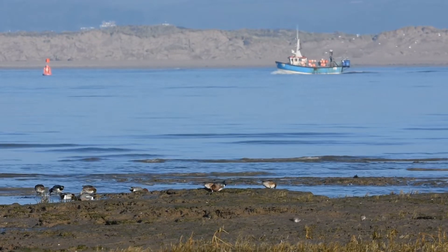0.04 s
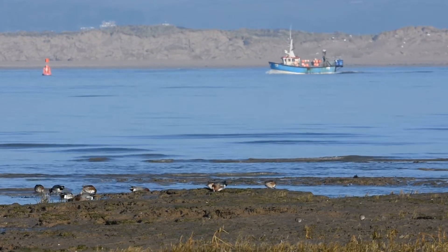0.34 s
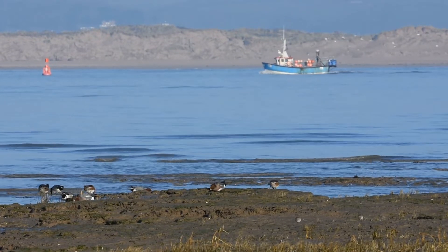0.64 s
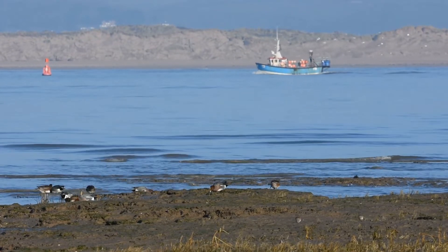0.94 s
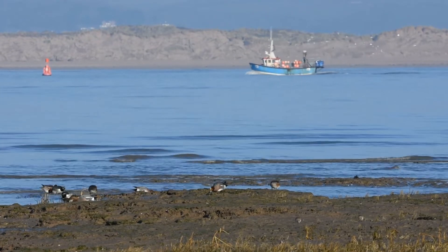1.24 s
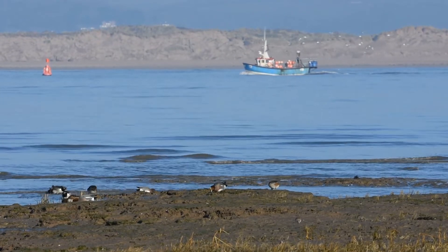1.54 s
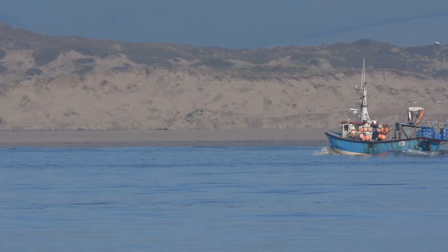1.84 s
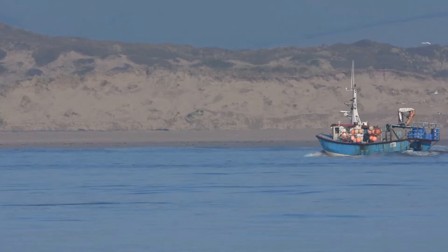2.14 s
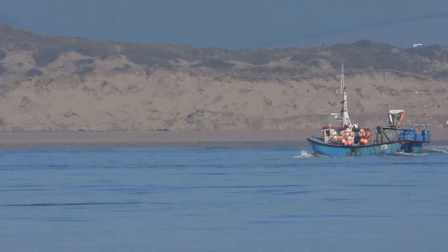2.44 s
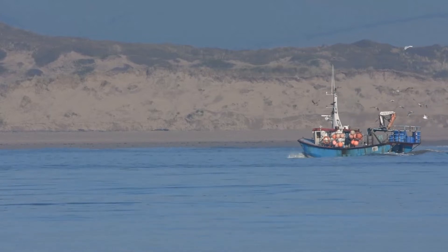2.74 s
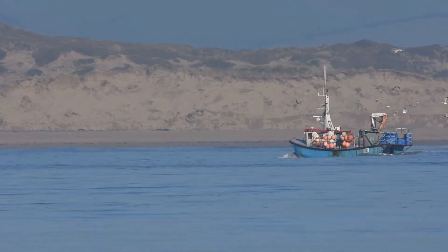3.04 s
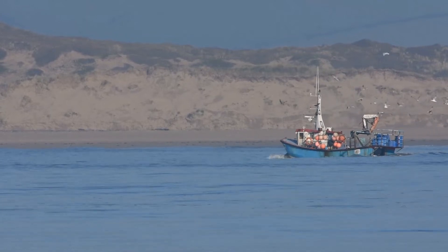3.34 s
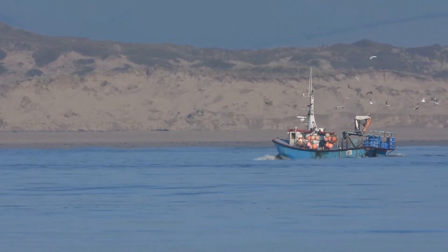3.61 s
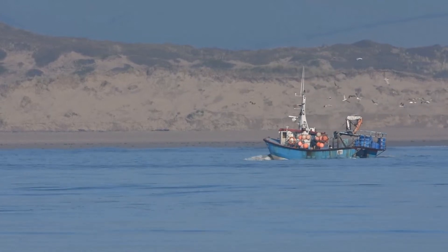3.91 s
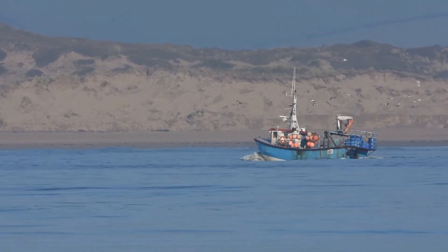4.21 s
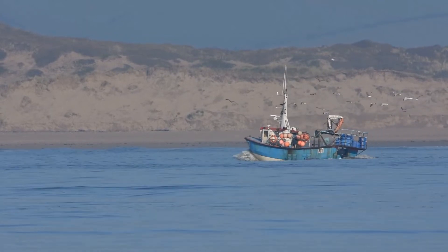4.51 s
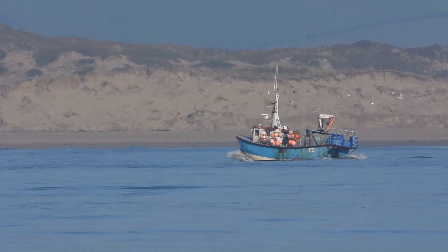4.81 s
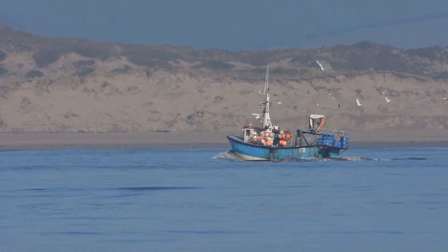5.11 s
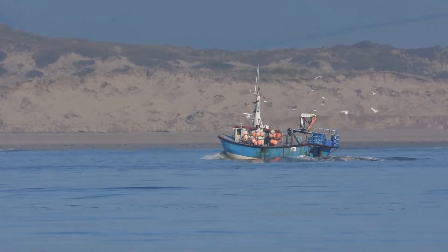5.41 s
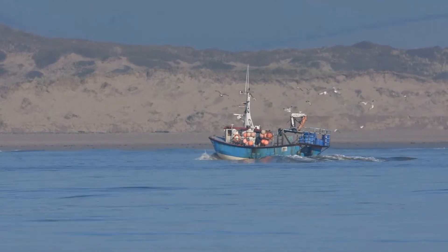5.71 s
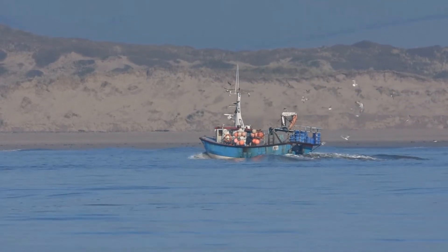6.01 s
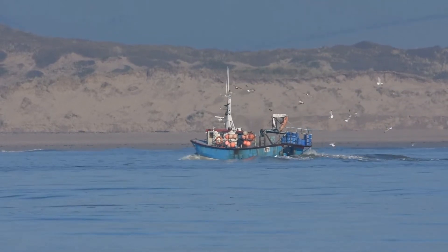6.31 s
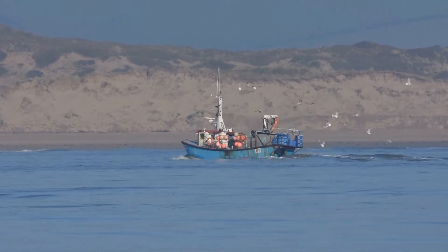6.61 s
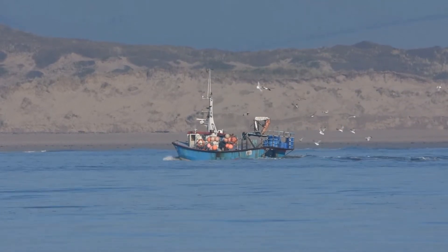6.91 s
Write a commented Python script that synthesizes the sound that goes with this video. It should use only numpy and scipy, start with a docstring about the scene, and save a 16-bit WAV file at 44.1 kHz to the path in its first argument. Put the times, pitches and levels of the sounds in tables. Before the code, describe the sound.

A flock of gulls squabbles by the shore, their harsh cries overlapping above a quiet, even wash of water and a distant fishing boat's hum. High yelps and sinking wails lead into a busier second half, with one bird calling note after note among squawks, peeps and whistles, and far birds yapping behind. The cries have a dull, light outdoor echo and a slightly clipped edge at the microphone.

```python
"""Gulls squabble over an estuary; each cry is a jittering membrane tone.
Three arched call notes open, with high yelps and young birds' whistles, over water and a boat's engine.
From 1 to 4 s come four mews, with a bark at 3.1 s. From 3.3 s a long call runs on, note after note,
amid falling cries, peeps and squawks. The far flock is loudest at 4.5 s; one tick follows at 5.8 s.
Throughout, the shore echoes and loud cries have a gritty, clipped edge, like an overloaded microphone."""
import sys
import numpy as np
from scipy import signal
from scipy.fft import rfft, irfft
from scipy.io import wavfile
from scipy.ndimage import uniform_filter1d

SR = 44100
rng = np.random.default_rng(int(sys.argv[2]) if len(sys.argv) > 2 else 0)


def output_pcm(signal):
    """Save a mono or channel-first signal as 16-bit PCM at the path in sys.argv[1].

    Samples are clipped to [-1, 1] before scaling.
    """
    pcm = np.clip(np.atleast_2d(signal).T, -1, 1) * 32767
    wavfile.write(sys.argv[1], SR, np.round(pcm).astype(np.int16))


N = 315315

# One bird's long calls. Each row, one note: start, drop and end in seconds, held level in dB,
# fall level in dB, octave over fundamental during the fall in dB.
CALL_NOTES = [(0.104, 0.183, .249, -29, -24, 4.5), (.431, 0.514, .588, -29.5, -28, 6),
              (0.774, 0.851, .955, -34, -31, 5), (3.269, 3.377, 3.422, -32.5, -22.5, -2.5),
              (3.542, 3.641, 3.698, -31, -24, -1.5), (3.839, 3.958, 4.003, -29.5, -23, -2),
              (4.134, 4.239, 4.294, -32, -24, 2.5), (4.422, 4.53, 4.582, -28, -24.5, 3),
              (4.715, 4.823, 4.868, -31, -21.5, .5), (5.006, 5.097, 5.15, -29, -26, 7.5),
              (5.29, 5.409, 5.507, -28.5, -21.5, -11.5), (5.602, 5.707, 5.761, -36.5, -28, -1.5),
              (5.883, 5.991, 6.065, -34.5, -33, -0.5), (6.187, 6.293, 6.335, -37, -29, 1.5),
              (6.474, 6.57, 6.617, -34, -28, 1), (6.765, 6.875, 6.974, -36.5, -30, -11)]
# That bird's excitement. Each row: time in seconds, excitement from 0 to 1.
CALL_EXCITEMENT = [(.1, 0), (.9, 0), (3.3, 0.4), (4.1, 1), (4.8, 0.7), (5.9, 0.75), (6.9, 0.4)]
# Drawn-out wails. Each row: start, crest, fade onset and end in seconds, crest pitch in Hz,
# pitch it sinks towards in Hz, level in dB, octave over fundamental in dB.
MEW_NOTES = [(1.076, 1.13, 1.145, 1.38, 1302, 1096, -20.5, -14),
             (2.171, 2.16, 2.275, 2.53, 1530, 1253, -22.5, -3),
             (2.546, 2.61, 2.592, 2.78, 1297, 1090, -24, -14.5),
             (3.652, 3.65, 3.75, 4.03, 1500, 1272, -31, 0)]
# Short falling cries. Each row: start and end in seconds, base pitch in Hz, level in dB,
# octave over fundamental in dB.
FALL_NOTES = [(1.372, 1.465, 1338, -31, -18), (3.721, 3.817, 1303, -31, -9), (4.108, 4.263, 1330, -29, -8),
              (4.692, 4.808, 1496, -28.5, -6.5), (4.889, 4.995, 1333, -33.5, -2.5),
              (5.057, 5.146, 1426, -21.5, -10.5), (5.282, 5.357, 1314, -28.5, -5),
              (5.549, 5.726, 1350, -31.5, -7), (5.749, 5.844, 1408, -32, .5),
              (5.798, 5.901, 1201, -29.5, 0), (6.029, 6.112, 1273, -32.5, -11),
              (6.117, 6.197, 1431, -29, 0.5), (6.18, 6.273, 1465, -34.5, -6), (6.436, 6.533, 1404, -29, -3),
              (6.523, 6.577, 1494, -27, -6.5), (6.798, 6.884, 1426, -30.5, 0.5)]
# Their common glide. Each row: share of the length, ratio to base pitch.
FALL_GLIDE = [(0, 0.99), (0.299, .95), (.75, .895), (1, .8)]
# One high-voiced bird. Each row: start in seconds, pitch drop in seconds, octave level in dB.
YELP_NOTES = [(.234, .227, -40.5), (.725, .79, -43.5), (1.031, 1.11, -39), (1.423, 1.425, -37),
              (1.685, 1.752, -37.5), (1.934, 1.929, -43.5), (2.068, 2.069, -36.5), (2.397, 2.391, -37.5),
              (2.513, 2.575, -41.5), (2.727, 2.719, -36.5), (2.889, 2.896, -43), (2.992, 3.047, -37),
              (3.163, 3.222, -45.5), (3.334, 3.367, -37.5), (3.533, 3.542, -43), (3.869, 3.866, -43.5),
              (4.188, 4.188, -45), (4.475, 4.515, -37), (5.968, 5.971, -47.5)]
# Young birds. Each row: start and end in seconds, first and last pitch in Hz, level in dB.
WHISTLE_NOTES = [(0, 0.132, 1748, 1712, -35.5), (0.099, 0.2, 1715, 1722, -32.5),
                 (2.87, 3.015, 2170, 2070, -28), (3.013, 3.152, 2110, 2203, -28.5),
                 (4.276, 4.364, 2033, 1966, -35.5), (4.335, 4.465, 2180, 2050, -34.5),
                 (4.46, 4.607, 2095, 2184, -35), (4.656, 4.712, 2180, 2145, -32),
                 (5.449, 5.529, 1947, 1890, -24), (5.575, 5.86, 2315, 2347, -38.5),
                 (5.855, 5.906, 2244, 2029, -22.5), (6.397, 6.473, 2420, 2306, -30),
                 (6.46, 6.757, 2150, 2240, -35), (6.916, 6.997, 1984, 1888, -30.5)]
# Brief rising notes. Each row: start in seconds, first pitch in Hz, level in dB,
# octave over fundamental in dB.
PEEP_NOTES = [(1.998, 1395, -42, -4.5), (2.659, 1414, -42, -1), (2.785, 1491, -26, -12.5),
              (4.04, 1298, -35.5, -1), (5.965, 1397, -39, 3), (6.35, 1420, -35.5, 4.5),
              (6.731, 1458, -27.5, -10), (7.022, 1380, -38.5, -3), (7.11, 1495, -34.5, -3)]
# Short hoarse squawks, some at the end of other cries. Each row: start in seconds, level in dB.
SQUAWKS = [(0.588, -33), (2.522, -28), (4.362, -32.5), (4.968, -24), (5.258, -26.5), (5.68, -27),
           (6.437, -26)]
# Distant birds. Each row: time in seconds, level in dB.
FAR_FLOCK_DB = [(0, -48.5), (1.7, -46), (3.2, -41), (4.5, -35), (6, -37), (7.15, -38)]
# Water and distant engine noise. Each row: frequency in Hz, relative spectral density in dB.
WASH_SPECTRUM = [(25, -17), (70, -4), (170, 4.5), (350, -1), (850, -5.5), (4100, -11.5), (4700, -25.5),
                 (16000, -46)]
# The engine's higher tone. Each row: time in seconds, level in dB.
ENGINE_DRONE_DB = [(0, -75), (2.6, -66.5), (2.95, -53), (3.4, -61.5), (4.5, -56.5), (5.6, -61.5),
                   (7.15, -71)]
# Wind puffs. Each row: centre in seconds, peak level in dB.
WIND_PUFFS = [(2.52, -49), (3.97, -46)]

SQUAWK_HZ, SQUAWK_HARSH_REL_DB = 1119, -37.5
TIME_S = np.arange(N) / SR


def from_db(db):
    return 10 ** (np.asarray(db) / 20)


def unit_rms(x):
    return x / np.sqrt(np.mean(x ** 2) + 1e-20)


def butter(x, hz, kind, order=2):
    return signal.sosfilt(signal.butter(order, hz, kind, fs=SR, output="sos"), x)


def lookup(x, table):
    return np.interp(x, *np.transpose(table))


def drift(count, rate_hz):
    """Gaussian random points joined by straight lines."""
    knots = rng.standard_normal(int(count * rate_hz / SR) + 2)
    return np.interp(np.arange(count) * rate_hz / SR, np.arange(len(knots)), knots)


def arch_db(t, depth_db):
    """Swell to the middle, then ebb."""
    return depth_db * (np.sin(np.pi * np.linspace(0, 1, len(t))) - .75)


def add(out, t, sound):
    """Mix in at t[0] seconds."""
    at = max(int(t[0] * SR), 0)
    out[at:at + len(sound)] += sound[:max(len(out) - at, 0)]


def syrinx(t, hz, first_db, second_db, jitter, doubling_rel_db, upper_rel_db, harsh_db=-99,
           step_db=-11, attack_s=.0045, release_s=.007, flutter_db=2.0):
    """One cry: a jittering membrane tone with thin overtones and a gritty, clipped treble edge."""
    count = len(t)
    phase = 2 * np.pi * np.cumsum(hz * (1 + jitter * drift(count, 900))) / SR
    tone = from_db(first_db) * np.sin(phase)
    tone += from_db(second_db) * np.sin(2 * phase + rng.uniform(0, 2 * np.pi))
    third_db = np.minimum(second_db, (first_db + second_db) / 2) + upper_rel_db
    for k in range(3, 6):
        throat_db = np.interp(k * hz, [4150, 4700], [0, -8])
        tone += from_db(third_db + throat_db + (k - 3) * step_db) * np.sin(k * phase)
    # Alternate cycles differ: lines between the harmonics.
    tone += from_db(first_db + doubling_rel_db) * (np.sin(1.5 * phase) + .5 * np.sin(2.5 * phase))
    # Flattened wave tops, like an overloaded microphone: gritty treble overtones.
    wave = tone / (from_db(first_db) + from_db(second_db)) + .05 * drift(count, 3000)
    grit = butter(np.clip(wave, -.45, .45), 4320, "high", order=6)
    tone += from_db(harsh_db) * unit_rms(grit)
    envelope = np.clip(np.minimum((t - t[0]) / attack_s, (t[-1] - t) / release_s), 0, 1)
    air_flutter = from_db(flutter_db * drift(count, 130))
    return tone * envelope * air_flutter


def long_calls(calm_hz=1517, excited_hz=1599, rasp_hz=1200):
    """Each note opens with a rising rasp, is held, catches, then falls steeply and louder."""
    out = np.zeros(N)
    for start, drop, end, held_db, fall_db, octave_rel_db in CALL_NOTES:
        t = np.arange(start, end + .0016, 1 / SR)
        fall_s = end - drop
        excitement = lookup(start, CALL_EXCITEMENT)
        top_hz = calm_hz + excitement * (excited_hz - calm_hz)
        catch_db = np.interp(excitement, [.15, .5], [2, -17])
        dulling_db = np.interp(excitement, [.15, .5], [0, -3])
        drop_ratio = np.interp(excitement, [.15, .5], [.99, .97])
        end_ratio = np.interp(excitement, [.15, .5], [.735, .755])
        turns_s = [start, (start + drop) / 2, drop - .012, drop,
                   drop + .27 * fall_s, drop + .77 * fall_s, end]
        hz = top_hz * np.interp(t, turns_s, [.968, .995, 1, drop_ratio, .9, .83, end_ratio])
        push = np.interp(t, [drop - .003, drop + .0094], [0, 1])
        swell_db = np.interp(t, [start, drop - .04, drop - .014, drop + .0051, drop + fall_s / 2, end],
                             [1.5, 1.5, catch_db, -1, 0, -4])
        first_db = held_db + push * (fall_db - held_db) + swell_db
        accent_db = 7 * np.exp(-(t - start) / .018)
        second_db = first_db + accent_db + (1 - push) * (dulling_db - 3) + push * octave_rel_db
        # The voice cracks at the end.
        jitter = np.interp(t, [drop, end - .018, end], [.003, .004 + .008 * excitement, .045])
        harsh_db = -45 + .92 * (fall_db + max(octave_rel_db, octave_rel_db / 2) + 23) + dulling_db
        grit_db = np.interp(t, [drop - .005, drop + .23 * fall_s, end - .3 * fall_s, end],
                            [-37, 3, 4.5, -15.5])
        add(out, t, syrinx(t, hz, first_db, second_db, jitter, doubling_rel_db=-36,
                           upper_rel_db=-16 + 7 * push * excitement, harsh_db=harsh_db + grit_db,
                           attack_s=.005, flutter_db=1.7))
        squawk(out, start - .033, rasp_hz, held_db - 3 * excitement, harsh_db - 13,
               octave_rel_db=-5, upper_rel_db=-12.5, glide=.26, length_s=.0242, jitter=.086)
    return out


def mews(rise_hz_per_s2=22100, sink_s=.12, swell_db_per_s=102, fade_db_per_s=63, dull_db_per_s=35):
    """Wails crest, sink and fade, octave first; period doubling and harshness peak with the level."""
    out = np.zeros(N)
    for start, crest, fade, end, top_hz, low_hz, db, octave_rel_db in MEW_NOTES:
        t = np.arange(start, end, 1 / SR)
        before_s, after_s, fading_s = np.maximum([crest - t, t - crest, t - fade], 0)
        sink = np.exp(-(after_s / sink_s) ** 1.5)
        hz = low_hz + (top_hz - low_hz) * sink - rise_hz_per_s2 * before_s ** 2
        first_db = db - swell_db_per_s * before_s - fade_db_per_s * fading_s
        second_db = first_db + octave_rel_db - dull_db_per_s * fading_s
        doubling_rel_db = np.interp(first_db, [-32, -22], [-20, -15])
        harsh_db = first_db - 28 + 2 * (first_db - db)
        add(out, t, syrinx(t, hz, first_db, second_db, jitter=.0082, doubling_rel_db=doubling_rel_db,
                           upper_rel_db=-17, harsh_db=harsh_db, step_db=-4.5, flutter_db=1.46))
    return out


def falling_cries():
    """Each cry sinks, then cracks; the stronger its octave, the harsher it is."""
    out = np.zeros(N)
    for start, end, base_hz, db, octave_rel_db in FALL_NOTES:
        t = np.arange(start, end, 1 / SR)
        hz = base_hz * lookup(np.linspace(0, 1, len(t)), FALL_GLIDE)
        jitter = np.interp(t, [end - .02, end], [.012, .07])
        second_db = db + octave_rel_db
        add(out, t, syrinx(t, hz, db, second_db, jitter, doubling_rel_db=-37, upper_rel_db=-14,
                           harsh_db=second_db - 27, step_db=-3, attack_s=.0039, flutter_db=4))
    return out


def yelps(full_yelp_db=-34.5, break_after_s=.057):
    """A thin note, led at first by its octave, slides down until the voice breaks into a squawk."""
    out = np.zeros(N)
    for start, drop, db in YELP_NOTES:
        t = np.arange(start, drop + .0605, 1 / SR)
        hz = np.interp(t - drop, [0, .022, .06], [2120, 1985, 1890])
        second_db = db + np.interp(t - drop, [-.07, 0], [-7, 1])
        first_db = second_db + np.interp(t - drop, [0, .035], [-6, 2])
        add(out, t, syrinx(t, hz, first_db, second_db, jitter=.002, doubling_rel_db=-48,
                           upper_rel_db=-16.5, attack_s=.0079))
        break_db = full_yelp_db + 10.5 + 1.35 * (db - full_yelp_db)
        squawk(out, drop + break_after_s, SQUAWK_HZ, break_db, break_db + SQUAWK_HARSH_REL_DB)
    return out


def squawk(out, start_s, hz, db, harsh_db, octave_rel_db=-14, upper_rel_db=3, glide=-.11,
           length_s=.0335, jitter=.054):
    """The voice breaks into a short, low, chaotic rasp, mixed into out."""
    t = np.arange(start_s, start_s + length_s, 1 / SR)
    pitch_hz = hz * (1 + glide * np.linspace(-.5, .5, len(t)))
    add(out, t, syrinx(t, pitch_hz, db, db + octave_rel_db, jitter, doubling_rel_db=-26,
                       upper_rel_db=upper_rel_db, harsh_db=harsh_db))


def whistles():
    """Young birds' thin, nearly pure glides; only the lowest keep a clear octave."""
    out = np.zeros(N)
    for start, end, first_hz, last_hz, db in WHISTLE_NOTES:
        t = np.arange(start, end, 1 / SR)
        hz = last_hz + (first_hz - last_hz) * np.linspace(1, 0, len(t)) ** 2
        first_db = db + arch_db(t, depth_db=6)
        second_db = first_db + np.interp(first_hz, [1750, 1900], [-7, -28])
        add(out, t, syrinx(t, hz, first_db, second_db, jitter=.0022, doubling_rel_db=-34.5,
                           upper_rel_db=-11, flutter_db=1.9))
    return out


def peeps(length_s=.081, rise_hz_per_s=742):
    """Short notes that creep upwards."""
    out = np.zeros(N)
    for start, first_hz, db, octave_rel_db in PEEP_NOTES:
        t = np.arange(start, start + length_s, 1 / SR)
        hz = first_hz + rise_hz_per_s * (t - start)
        first_db = db + arch_db(t, depth_db=7)
        add(out, t, syrinx(t, hz, first_db, first_db + octave_rel_db, jitter=.01, doubling_rel_db=-36,
                           upper_rel_db=-19, attack_s=.0078))
    return out


def bark_and_tick(bark_s=3.133, tick_s=5.756):
    """A hoarse bark at the end of a whistle; later, one crisp tick."""
    out = np.zeros(N)
    squawk(out, bark_s, hz=1324, db=-22, harsh_db=-55, octave_rel_db=-4.5, upper_rel_db=-11,
           length_s=.021)
    t = np.arange(0, .01, 1 / SR)
    add(out, tick_s + t, from_db(-27) * drift(len(t), 14000) * np.exp(-t / .002))
    return out


def far_flock(yaps=150):
    """Distant birds yap at random, short and hoarse, dulled by the air."""
    out = np.zeros(N)
    for when, length, pitch, strength in rng.random((yaps, 4)):
        t = when * N / SR + np.arange(0, .026 + .0635 * length, 1 / SR)
        hz = (1120 + 400 * pitch ** 2) * (1 - .0832 * np.linspace(0, 1, len(t)))
        add(out, t, syrinx(t, hz, 8 * strength, 8 * strength - 7, jitter=.035, doubling_rel_db=-17,
                           upper_rel_db=3.5, attack_s=.0086))
    return unit_rms(butter(out, 2820, "low", order=4)) * from_db(lookup(TIME_S, FAR_FLOCK_DB))


def shore_echo(x, t60_s=.7, delay_s=.012, gain_db=-17):
    """Mud banks and dunes scatter back a dull, thin tail."""
    t = np.arange(SR) / SR
    tail = rng.standard_normal(SR) * from_db(-60 * t / t60_s) * (t > delay_s)
    echo = signal.fftconvolve(x, tail / np.linalg.norm(tail))[:N]
    return from_db(gain_db) * butter(echo, 3600, "low", order=4)


def water_wash(level_db=-47):
    """Even noise of water and distant engine."""
    hz, db = np.transpose(WASH_SPECTRUM)
    bin_hz = np.arange(N // 2 + 1) * SR / N
    colour = from_db(np.interp(np.log(bin_hz + 1), np.log(hz), db))
    return from_db(level_db) * unit_rms(irfft(rfft(rng.standard_normal(N)) * colour, N))


def boat_engine(hum_hz=160, hum_db=-62.5, drone_hz=300):
    """A wavering hum, and a higher drone that comes and goes."""
    hum_phase = 2 * np.pi * np.cumsum(hum_hz * (1 + .015 * drift(N, 12))) / SR
    hum = np.sin(hum_phase) * from_db(3.6 * drift(N, 4.2))
    drone_phase = 2 * np.pi * np.cumsum(drone_hz * (1 + .00787 * drift(N, 12))) / SR
    drone = np.sqrt(2) * np.sin(drone_phase) * from_db(lookup(TIME_S, ENGINE_DRONE_DB))
    return from_db(hum_db) * unit_rms(hum) + drone


def wind(band_hz=(45, 115), half_width_s=.048):
    """Soft, low bumps of air on the microphone."""
    puffs = sum(from_db(db) * np.exp(-((TIME_S - at_s) / half_width_s) ** 2) for at_s, db in WIND_PUFFS)
    return puffs * unit_rms(butter(rng.standard_normal(N), band_hz, "band"))


def scene():
    """Near birds, far birds, their echo, water, boat and wind, in mono."""
    near = long_calls() + falling_cries() + peeps() + whistles() + yelps() + mews() + bark_and_tick()
    for start, db in SQUAWKS:
        squawk(near, start, SQUAWK_HZ, db, db + SQUAWK_HARSH_REL_DB)
    birds = near + far_flock()
    return (birds + shore_echo(birds) + water_wash() + boat_engine() + wind())[None]


def record(dry, limit=.18, release_db_per_s=150, ceiling=.13, cutoff_hz=15600):
    """A fast limiter holds the loudest cries down, a soft clip rounds the rest, the top is cut."""
    over_db = np.maximum(20 * np.log10(np.abs(dry) / limit + 1e-9), 0)
    ramp_db = release_db_per_s * TIME_S
    reduction_db = np.maximum.accumulate(over_db + ramp_db, axis=-1) - ramp_db
    limited = dry * from_db(-uniform_filter1d(reduction_db, size=128))
    clipped = limited / (1 + np.abs(limited / ceiling) ** 10) ** (1 / 10)
    return signal.sosfilt(signal.ellip(10, .1, 80, cutoff_hz, fs=SR, output="sos"), clipped)


dry = scene()
out = record(dry)
output_pcm(out)
```